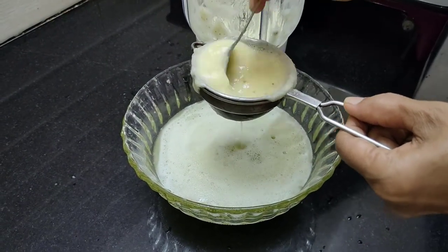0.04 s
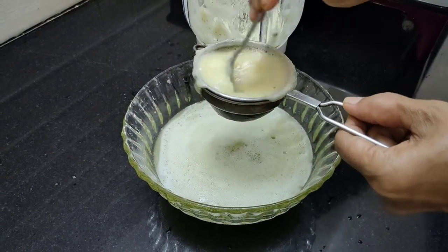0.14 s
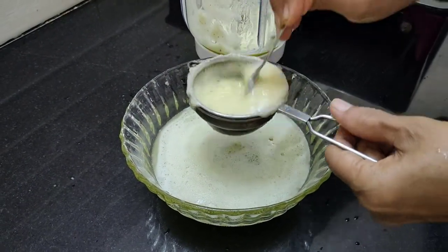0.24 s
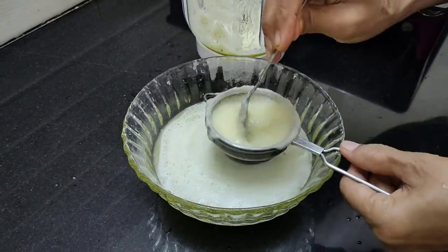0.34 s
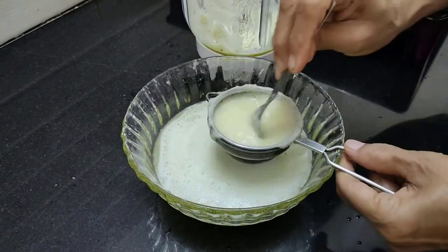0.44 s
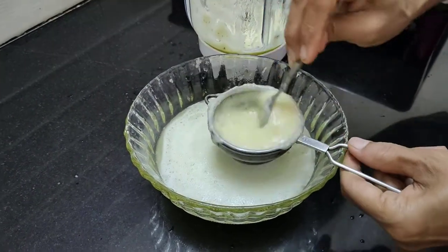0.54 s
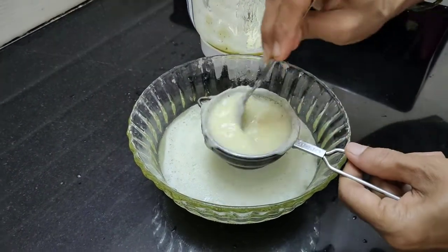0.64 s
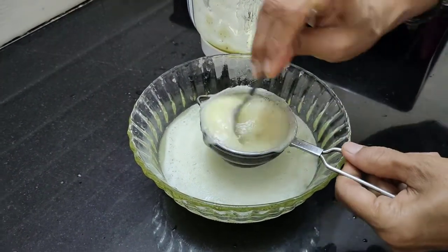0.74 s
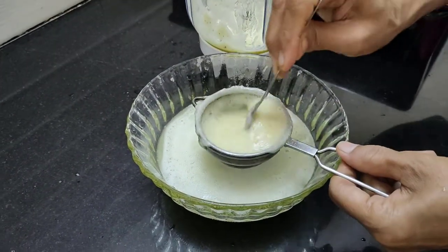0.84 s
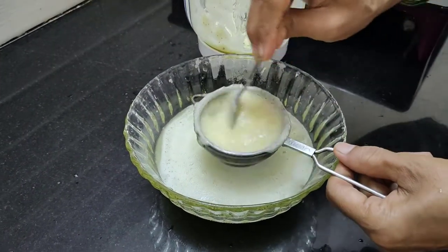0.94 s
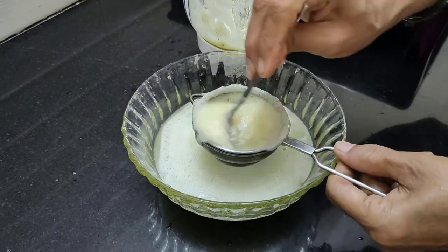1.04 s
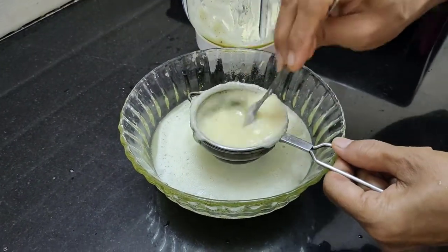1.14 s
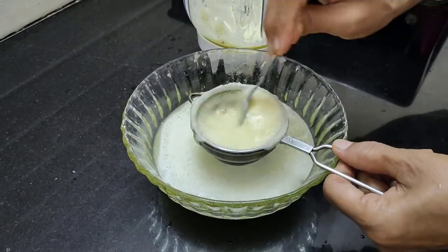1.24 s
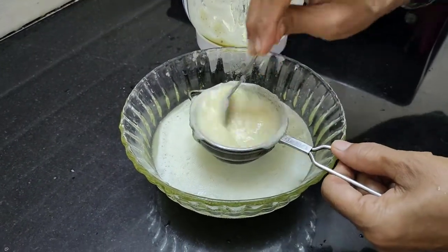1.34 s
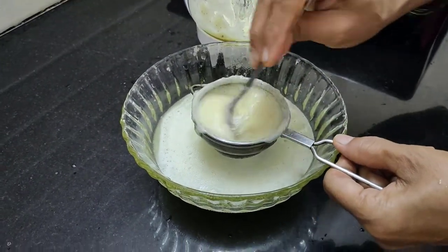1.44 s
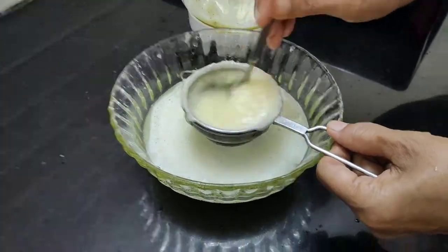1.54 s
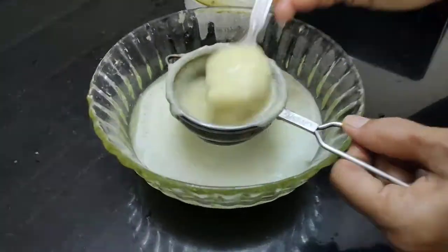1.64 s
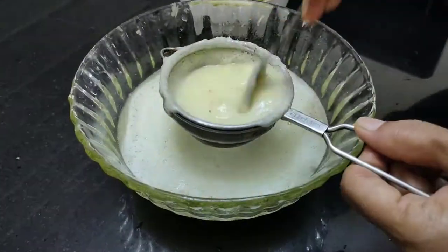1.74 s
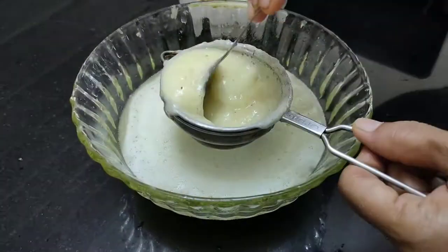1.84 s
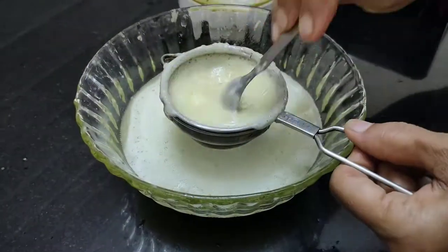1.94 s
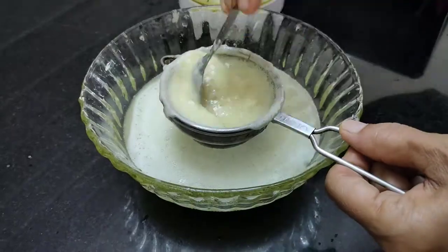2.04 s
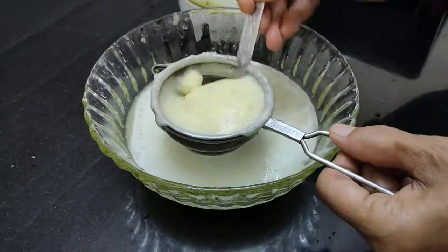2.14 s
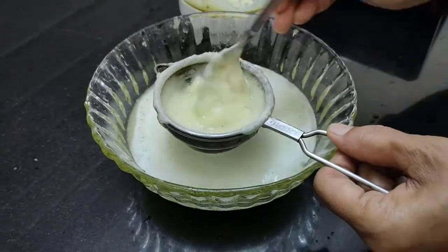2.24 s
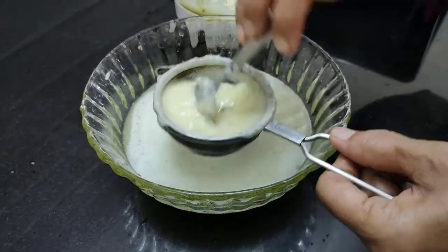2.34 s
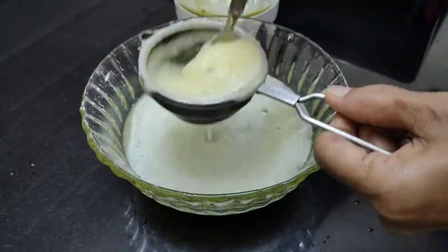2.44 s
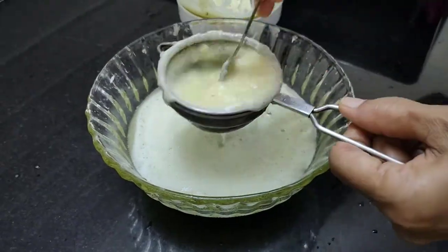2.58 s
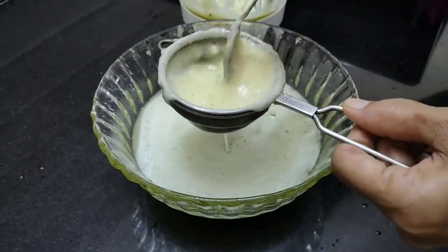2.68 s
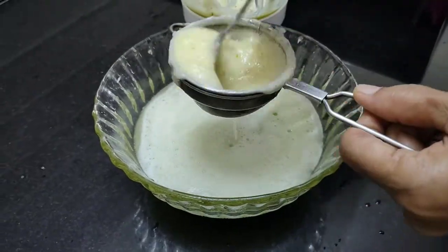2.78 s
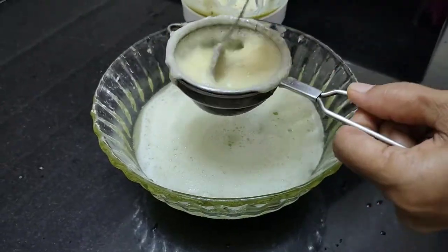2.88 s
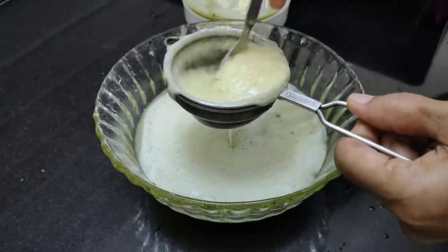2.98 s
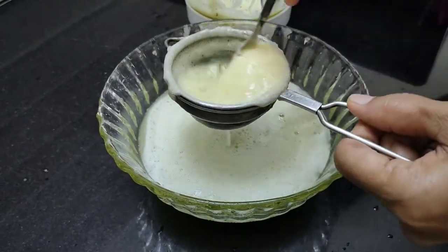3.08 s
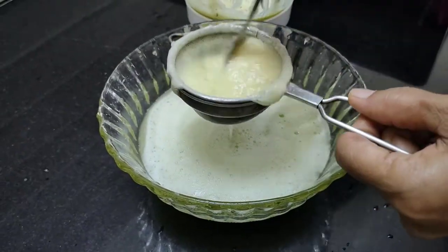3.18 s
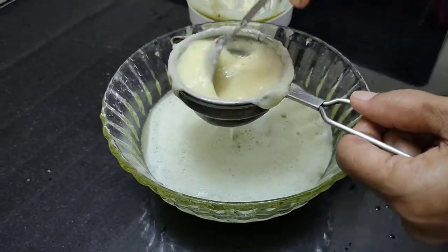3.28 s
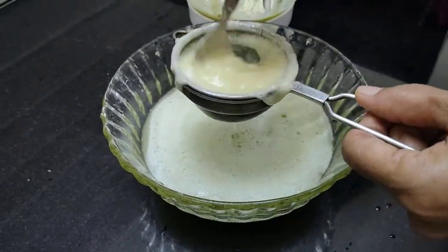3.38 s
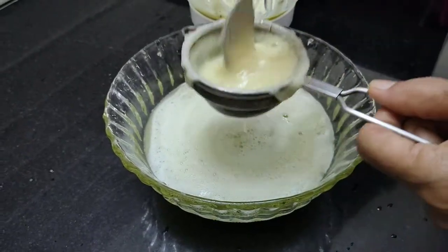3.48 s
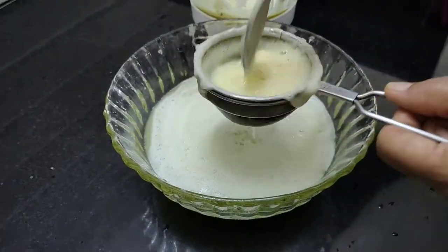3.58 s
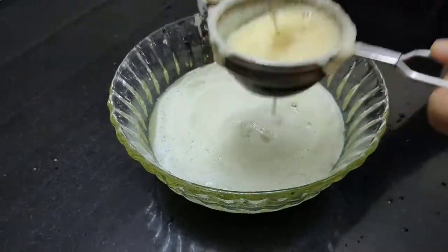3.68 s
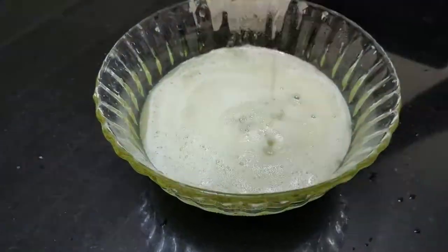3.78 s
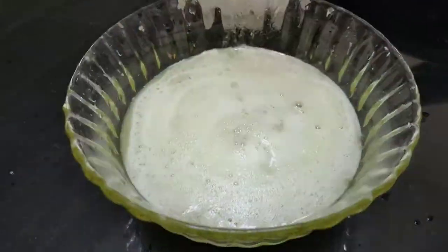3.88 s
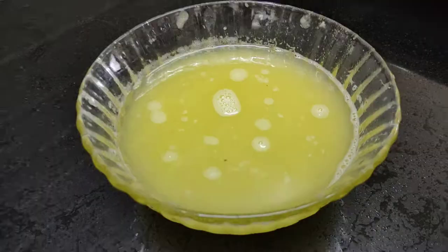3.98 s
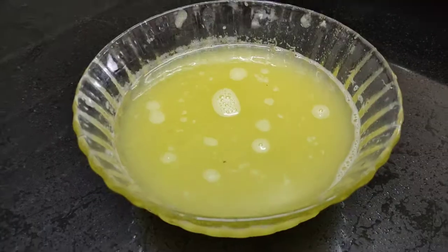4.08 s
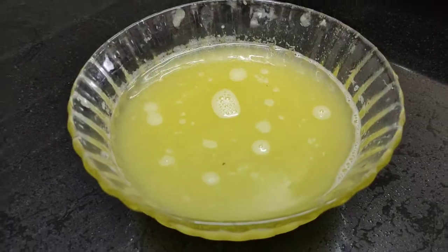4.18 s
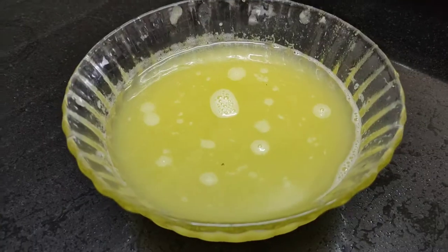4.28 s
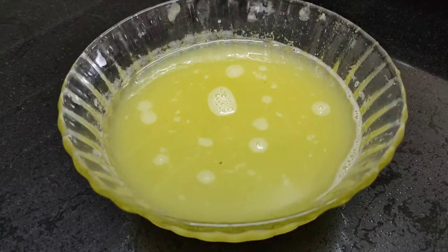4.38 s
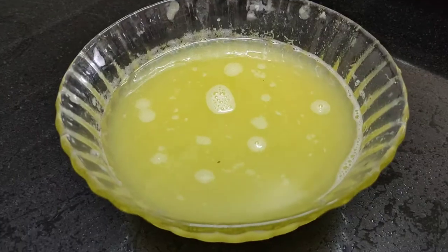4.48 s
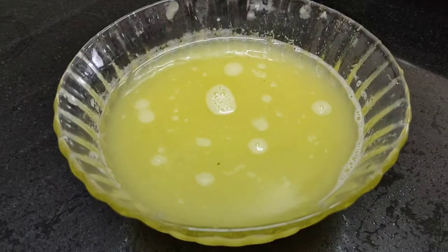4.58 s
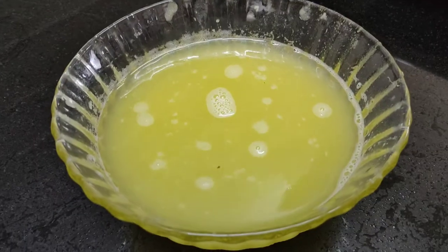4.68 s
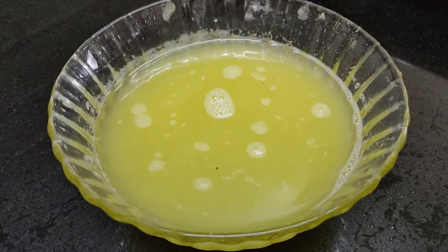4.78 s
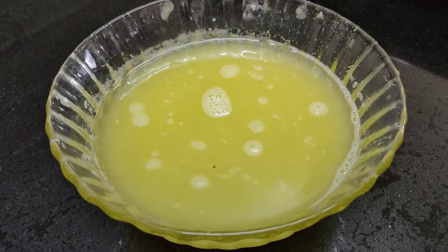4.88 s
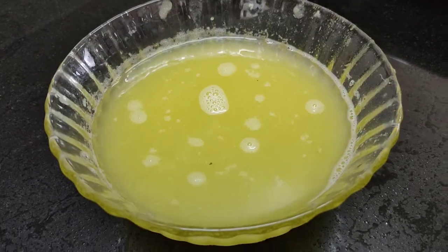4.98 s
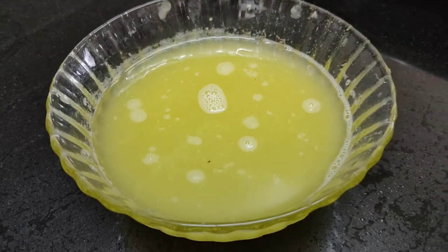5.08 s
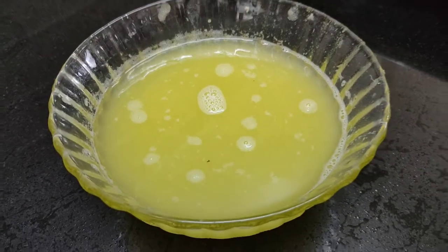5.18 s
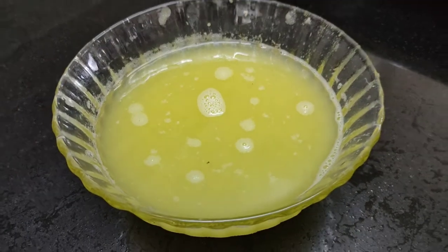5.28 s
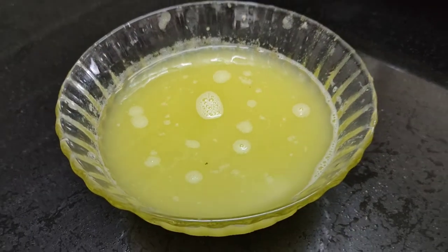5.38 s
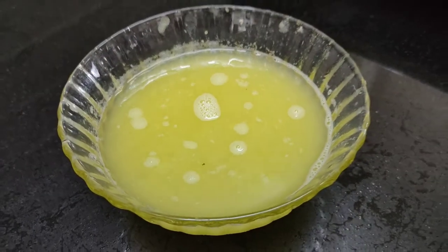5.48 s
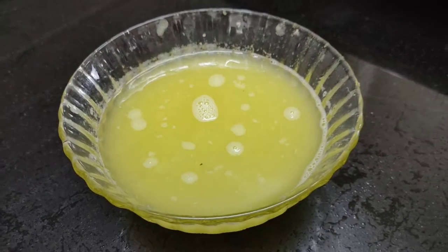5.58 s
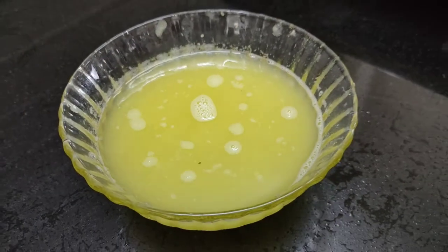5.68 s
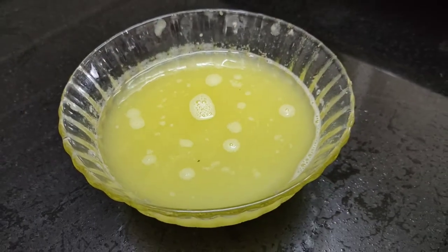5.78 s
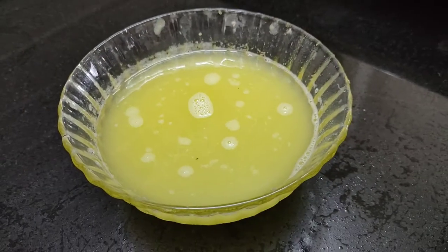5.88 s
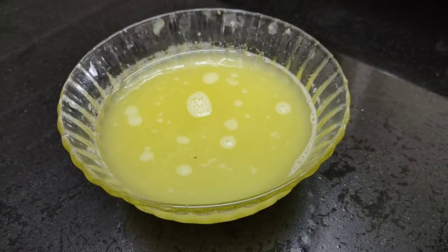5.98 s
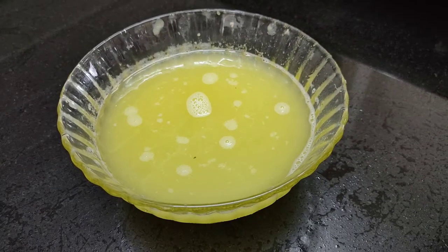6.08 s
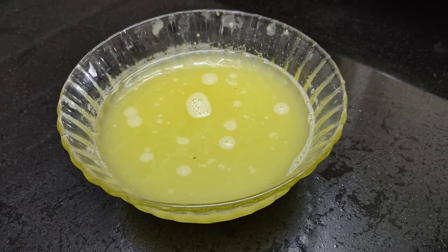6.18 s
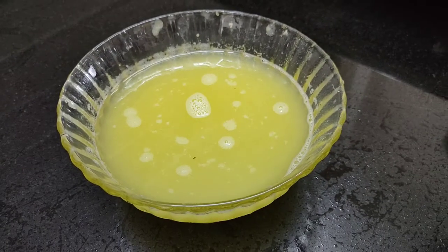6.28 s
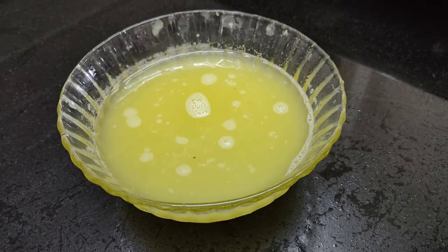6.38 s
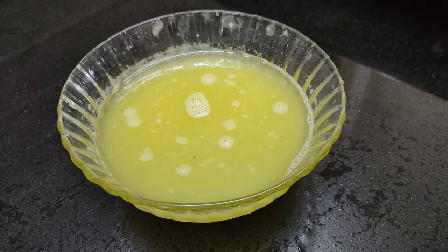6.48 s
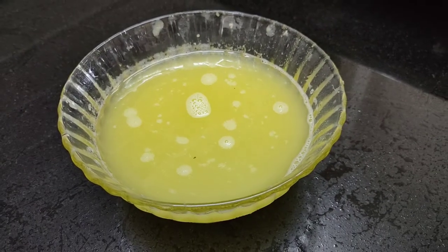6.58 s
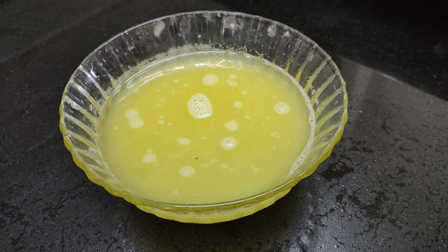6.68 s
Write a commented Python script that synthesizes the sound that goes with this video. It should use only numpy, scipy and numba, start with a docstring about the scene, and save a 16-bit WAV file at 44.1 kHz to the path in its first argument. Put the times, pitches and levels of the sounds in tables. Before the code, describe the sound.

Brisk, irregular spoon strokes squish and scrape thick pulp through fine wire mesh, with slippery plops, a brief gurgle and steel clicks, heard close in stereo with short kitchen reflections. After a short pause comes a quick run of loud metallic raps. The background then changes to a soft motor drone; a glassy dish lands, bounces, chatters against the worktop and rings away.

```python
"""A steel spoon works wet pulp through a fine mesh strainer over a glass bowl. Squelches are noise pops in gliding
pocket resonances; rasp and fizz are random grains coloured by the mesh; rim ticks and the knocks that clean
the strainer are noise bursts with decaying sines. Then, in a kitchen of motor tones and low noise, a dish is
brushed, set down and rocks to rest: each contact excites a bank of decaying modes."""
import sys
import numpy as np
from scipy import signal
from scipy.fft import rfft, irfft, next_fast_len
from scipy.io import wavfile
from scipy.ndimage import uniform_filter1d
from numba import njit

SR = 44100
rng = np.random.default_rng(int(sys.argv[2]) if len(sys.argv) > 2 else 0)


def generate_wav(signal):
    """Clip the signal to [-1, 1] and save it as 16-bit WAV at the path in sys.argv[1]."""
    frames = np.transpose(np.atleast_2d(signal))
    scaled = np.clip(frames, -1, 1) * 32767
    pcm = np.round(scaled).astype(np.int16)
    wavfile.write(sys.argv[1], SR, pcm)


N = 296793
TOP_HZ = 15750
TIME = np.arange(N) / SR
# left and right halves of a stereo difference
SIDES = np.array([[.5], [-.5]])


def undb(db):
    """Logarithmic level: decibels to gain."""
    return 10 ** (np.asarray(db) / 20)


def unit(x):
    """Normalisation: scale to rms 1."""
    return x / np.sqrt(np.mean(x ** 2))


def curve(rows):
    """Linear interpolation: join (s, value) rows by straight lines."""
    return np.interp(TIME, *np.transpose(rows))


def colour(x, points, peaks=()):
    """Spectral shaping: filter a white sound by (Hz, dB) points and resonances, keeping its power."""
    size = next_fast_len(x.shape[-1], True)
    f = np.fft.rfftfreq(size, 1 / SR)
    hz, db = np.transpose(points)
    shape = np.interp(np.log(f + 1), np.log(hz), db)
    for centre, width, lift, pan in peaks:
        shape = shape + (lift + pan * SIDES) / (1 + (2 * (f - centre) / width) ** 2)
    spectrum = rfft(x, size) * unit(undb(shape))
    return irfft(spectrum, size)[..., :x.shape[-1]]


def pair(size, alike_hz):
    """Interaural coherence: stereo noise alike below alike_hz, unrelated above it and in the deepest rumble."""
    f = np.fft.rfftfreq(size, 1 / SR)
    mid, side = rfft(rng.standard_normal((2, size)))
    apart = .05 + .95 * f ** 2 / (f ** 2 + alike_hz ** 2) + .7 / (1 + (f / 75) ** 4)
    return unit(irfft(mid * np.sqrt(2 - apart) + 2 * SIDES * side * np.sqrt(apart), size))


def fade(t, t60):
    """Exponential decay: a fall of 60 dB in t60 seconds."""
    return undb(-60 * t / t60)


def add(out, s, sound):
    """Superposition: mix a sound in at time s."""
    i = max(int(s * SR), 0)
    out[..., i:i + sound.shape[-1]] += sound[..., :N - i]


def grains(per_s, spread_db):
    """Shot noise: tiny impulses of uneven size at random moments."""
    size = undb(spread_db * np.clip(rng.standard_normal(N), -2, 2))
    return unit((rng.random(N) < per_s / SR) * size * rng.choice([-1, 1], N))


def walk(per_s):
    """Low-frequency noise: a random wander with a spread near 1."""
    knots = np.arange(0, N / SR + 1, 1 / per_s)
    return 1.2 * np.interp(TIME, knots, rng.standard_normal(len(knots)))


def swells(rows):
    """Gaussian envelopes: bell-shaped gains from (s, half length s, dB) rows."""
    return sum(undb(db) * np.exp(-((TIME - s) / half) ** 2) for s, half, db in rows)


def brighten(x, db, corner_hz):
    """Contact stiffness: a harder contact lifts the treble."""
    low = signal.lfilter(*signal.butter(1, corner_hz, fs=SR), x)
    return low + undb(db) * (x - low)


@njit
def cavity(x, hz, q):
    """Cavity resonance: a band-pass with a moving centre."""
    y, b, l = np.empty(len(x)), 0., 0.
    for i in range(len(x)):
        g = np.tan(np.pi * hz[i] / SR)
        v = (b + g * (x[i] - l)) / (1 + g * (g + 1 / q))
        b, l, y[i] = 2 * v - b, l + 2 * g * v, v
    return y


def chirp(hz, glide, cycles):
    """Damped resonance: a tone, as of an air pocket, dies over some cycles, sliding in octaves per s."""
    t = TIME[:SR // 12]
    age = t * hz / cycles
    phase = 2 * np.pi * np.cumsum(hz * 2 ** (glide * t)) / SR
    return np.sin(phase) * np.exp(-age) * (1 - np.exp(-10 * age))


def blow(t, points, peaks, ring_t60, tail_db, tail_t60, alike_hz, contact_s=0.0003):
    """High modal density: a noise burst of crowded, fast-dying resonances with a softer tail from the walls."""
    envelope = np.hypot(fade(t, ring_t60), undb(tail_db) * fade(t, tail_t60)) * np.tanh(t / contact_s)
    return colour(pair(len(t), alike_hz), points, peaks) * envelope


def hum(lines):
    """Harmonic motion: steady motor tones as sines of random phase."""
    return sum(np.sqrt(2) * undb(db) * np.sin(2 * np.pi * (hz * TIME + rng.random())) for hz, db in lines)


# Spectrum of the quiet air behind the straining. Each row: frequency in Hz, relative density in dB per Hz.
QUIET_COLOUR = [(25, 0), (100, -1.5), (250, 0), (390, -4.5), (520, -5.5), (900, -2.5), (2000, -8.5),
                (5000, -19), (15000, -32.5)]
# A faint hum in it. Each row: frequency in Hz, level in dB.
FAINT_HUM = [(383, -73), (439, -78), (532, -76)]


def quiet_air(quiet_db=-65):
    """Broadband background: shaped noise and faint steady tones."""
    return undb(quiet_db) * colour(pair(N, 500), QUIET_COLOUR) + hum(FAINT_HUM)


# The spoon scrapes out and sweeps back, usually softer. Each row: peak in seconds, half length in seconds
# before the rise and fall factors, rasp in dB, treble lift in dB, squelch in dB, squelch pitch in Hz,
# delay of the sweep back in seconds, its squelch in dB, its pitch in Hz. Levels are relative.
STROKES = [(.002, 0.017, -44, -5, -37.5, 1330, 0.074, -58.5, 836),
           (0.174, 0.019, -40, 0, -41.5, 1575, 0.071, -56, 1360),
           (0.442, 0.019, -36.5, -0.5, -36, 1510, 0.071, -36.5, 1296),
           (0.583, 0.014, -37, 1, -41.5, 1416, 0.014, -73, 1300),
           (0.717, .025, -30.5, -4.5, -39, 1440, 0.016, -59, 1400),
           (0.771, 0.021, -32.5, 4.5, -32.5, 1700, 0.088, -40.5, 1590),
           (0.926, 0.02, -29, 5.5, -34.5, 1550, 0.037, -39.5, 1190),
           (1.077, 0.02, -33.5, 7, -39, 1650, 0.09, -38.5, 1620),
           (1.215, 0.016, -28.5, -4, -37, 1500, .069, -33, 1230),
           (1.351, 0.01, -31.5, 7, -37.5, 1546, 0.098, -40, 1690),
           (1.485, .018, -27.5, 4.5, -30, 1674, 0.061, -43.5, 1700),
           (1.761, .014, -36, 9.5, -27, 1706, .03, -54, 1540),
           (1.878, 0.022, -50, 9.5, -42, 1830, .075, -40, 1820),
           (2.018, 0.013, -37, 3, -33.5, 1910, 0.04, -42, 1255),
           (2.128, 0.024, -36, 7.5, -35, 2240, 0.074, -63, 2090),
           (2.329, 0.053, -37.5, -8, -47, 1430, .044, -34.5, 1590),
           (2.402, 0.029, -29.5, 3.5, -37, 1780, 0.068, -32.5, 1760),
           (2.524, 0.015, -25, 4, -35, 1614, 0.08, -34.5, 1250),
           (2.642, 0.004, -23, 2.5, -45, 2220, .01, -55.5, 1800),
           (2.741, .014, -38.5, 9.5, -30.5, 1537, 0.087, -36.5, 2010),
           (2.928, 0.014, -28.5, 2, -30, 1560, .067, -37.5, 1516),
           (3.06, 0.02, -34.5, 5, -40, 1920, 0.044, -38, 1690),
           (3.163, 0.01, -46, 7.5, -40, 1780, 0.027, -65, 1600),
           (3.24, 0.0079, -40, 7, -34.5, 1720, 0.038, -39.5, 1540),
           (3.298, 0.014, -26, 0, -27, 1740, 0.037, -33, 1616),
           (3.371, 0.0057, -32.5, 0.5, -42, 1670, 0.027, -52, 1520),
           (3.418, 0.015, -29, 2, -33.5, 1900, 0.021, -62, 1710)]


def sweeps(rise=1.2, fall=1, back_half_s=.022, back_rasp_db=-3):
    """Reciprocating motion: each stroke out and back, as (s, rise s, fall s, squelch dB, pitch Hz, rasp dB)."""
    for s, half, dry_db, _, wet_db, hz, delay, back_db, back_hz in STROKES:
        yield s, rise * half, fall * half, wet_db, hz, dry_db
        yield s + delay, rise * back_half_s, fall * back_half_s, back_db, back_hz, back_db + back_rasp_db


def strokes(slips, wobble=0.083, wire_ratio=2.05, deep_share=0.605, deep_db=-11, pulp_lag=1.1,
            pocket_q=7, sag_octaves_per_s=7):
    """Forced resonance: pops excite squeezed air pockets, slips excite the wires; pitches sink and waver."""
    pops = grains(1800, 5)
    squelch, wires, pressure, kneading = np.zeros((4, N))
    for s, rise, fall, wet_db, hz, dry_db in sweeps():
        span = slice(max(int((s - .1) * SR), 0), int((s + .1) * SR))
        t = TIME[span] - s
        push = np.exp(-(t / np.where(t < 0, rise, fall)) ** 2)
        # the pulp closes more slowly than the spoon lets go
        squeeze = np.exp(-(t / np.where(t < 0, rise, fall * pulp_lag)) ** 2)
        effort = np.sqrt(np.mean(push ** 2))
        waver = np.interp(t, np.linspace(-.1, .1, 16), rng.standard_normal(16))
        pitch = hz * 2 ** (-sag_octaves_per_s * t) * np.exp(wobble * waver)
        # a small pocket in front of the spoon and a larger, weaker one beneath it
        for share, db in ((1, 0), (deep_share, deep_db)):
            pocket = cavity(cavity(pops[span] * squeeze, share * pitch, pocket_q), share * pitch, 1.3)
            squelch[span] += unit(pocket) * effort * undb(wet_db + db)
        # the wires under the spoon ring about an octave above the pocket, sliding as the contact moves
        wire_pitch = wire_ratio * pitch * np.exp(-.2 * waver)
        wires[span] += unit(cavity(slips[span] * push, wire_pitch, 9.)) * effort * undb(dry_db)
        pressure[span] += (push * undb(dry_db)) ** 2
        kneading[span] += squeeze * undb(wet_db)
    return squelch, wires, pressure, kneading


def bubbles(bubble_db=-1.5, cycles=6.5, sag=0.94, count=9):
    """Bubble acoustics: every sweep bursts a handful of small bubbles scattered around its pitch."""
    out = np.zeros(N)
    for s, rise, fall, wet_db, hz, _ in sweeps():
        for when, size, strength, slide in np.clip(rng.standard_normal((count, 4)), -1.7, 1.7):
            pitch = sag * hz * np.exp(.22 * size)
            at = s + 0.41 * when * (rise if when < 0 else fall)
            add(out, at, undb(wet_db + bubble_db + 2.4 * strength) * chirp(pitch, 8 * slide, cycles))
    return out


def pings(ping_db=-9, centre_hz=5200, spread=0.31, cycles=20, count=7):
    """Plucked excitation: in each sweep the spoon's edge plucks single wires, each with its own short ring."""
    out = np.zeros(N)
    for s, rise, fall, _, _, dry_db in sweeps():
        for when, size, strength in np.clip(rng.standard_normal((count, 3)), -1.8, 1.8):
            pitch = min(centre_hz * np.exp(spread * size), TOP_HZ)
            at = s + .5 * when * (rise if when < 0 else fall)
            add(out, at, undb(dry_db + ping_db + 4.5 * strength) * chirp(pitch, 0, cycles))
    return out


# Spectrum of the rasp. Each row: frequency in Hz, relative density in dB per Hz.
RASP_COLOUR = [(40, -57), (300, -51), (900, -31.5), (1600, -2), (2500, 3), (3200, -10), (5000, -2.5),
               (7200, 4.5), (10000, -2), (15500, -14.5)]
# Resonances of strainer and spoon, also heard in the fizz and rim ticks. Each row: frequency in Hz,
# width in Hz, lift in dB, left minus right in dB.
MESH = [(1200, 660, 15.5, 3.5), (1780, 69, 0, 12.5), (2550, 45, 7, 2), (2977, 190, 7, -15.5),
        (4015, 96, 9.5, 3), (5220, 210, 0.5, -13.5), (6620, 85, 1.5, -11), (13800, 1500, 0, 8)]


def rasp(slips, wires, pressure, touching, drag_db=-46, wire_db=-4.0):
    """Stick-slip friction: slips of the spoon's edge excite the mesh, with ringing and plucked wires."""
    drag = np.hypot(np.sqrt(pressure), undb(drag_db) * touching)
    sound = colour(slips * drag, RASP_COLOUR, MESH) + undb(wire_db) * wires + pings()
    # the angle of the spoon's edge makes each stroke brighter or duller
    return brighten(sound, curve([(s, treble_db) for s, _, _, treble_db, *_ in STROKES]), 4500)


# Spectrum of the juice's fizz. Each row: frequency in Hz, relative density in dB per Hz.
FIZZ_COLOUR = [(2000, -39), (4500, -12), (7500, -3), (10000, 4.5), (15500, -4)]
# Gushes of juice through the mesh. Each row: peak in seconds, half length in seconds, relative level in dB.
GUSHES = [(2.71, 0.034, -30), (2.83, 0.068, -35), (3.42, 0.046, -43), (3.48, 0.061, -55.5),
          (3.75, 0.14, -56.5)]


def fizz(catching, pressure, touching, squirt_db=-28, seep_db=-54):
    """Flow noise: juice seeps at each touch, gushes, and squirts under the hardest strokes."""
    flow = undb(seep_db) * touching + swells(GUSHES)
    flow = flow + undb(squirt_db) * (pressure / pressure.max()) ** 0.79
    return colour(grains(6300, 4.3) * np.sqrt(catching) * flow, FIZZ_COLOUR, MESH)


# Spectrum of the churning pulp. Each row: frequency in Hz, relative density in dB per Hz.
CHURN_COLOUR = [(80, -7), (200, -2.5), (290, 1), (380, 9), (470, -9), (700, -5), (1200, -6.5), (2500, -35)]
# The hollow of the strainer's cup. Each row: frequency in Hz, width in Hz, lift in dB, left minus right in dB.
CUP = [(380, 25, 7.5, 2)]
# Deep presses turn the whole pulp over. Each row: peak in seconds, half length in seconds, relative level in dB.
PRESSES = [(2.42, 0.059, -54.5), (2.63, 0.11, -46.5)]


def churn(kneading, knead_db=-36):
    """Cavity-coloured shot noise: kneaded pulp pops in the hollow of the cup."""
    return colour(grains(680, 3.8) * (undb(knead_db) * kneading + swells(PRESSES)), CHURN_COLOUR, CUP)


# Larger air pockets are squeezed out. Each row: peak in seconds, half length in seconds, pitch in Hz at the
# peak before jitter, relative level in dB, glide in octaves per second.
PLOPS = [(0.257, 0.0057, 1330, -34.5, -3), (0.435, 0.013, 1480, -34, -1.5), (.52, 0.0099, 1350, -32, -19),
         (0.576, 0.011, 1480, -32, -15), (.716, 0.0094, 1290, -28, -9.5), (0.862, 0.0075, 1400, -32.5, 11),
         (0.999, 0.013, 1560, -34.5, -2), (1.156, 0.0089, 1610, -26, -9), (1.261, 0.018, 850, -39.5, 9.5),
         (1.292, .011, 1420, -28, 17.5), (1.432, 0.015, 1600, -34, 13.5),
         (1.739, 0.0034, 1150, -26.5, -23.5), (1.761, .008, 2000, -23, 11), (1.765, .014, 900, -41, -6.5),
         (1.947, .013, 1600, -36.5, -11), (2.01, 0.0088, 2050, -30, -16), (2.116, 0.017, 2700, -37, -12),
         (2.335, 0.0078, 1400, -32, -11), (2.421, .009, 1650, -27.5, -14), (3, .0045, 1720, -23, -17),
         (3.061, 0.013, 1950, -27, -35), (3.1, 0.016, 1550, -35, -13), (3.24, 0.0063, 1700, -33.5, -21.5),
         (3.28, 0.0044, 1750, -24, -26), (3.421, 0.01, 1900, -24.5, -35.5)]


def plops(rough=.55, jitter=.035, flutter_per_s=330):
    """Volume-dependent resonance: a pocket flutters as it is squeezed out, its pitch sliding with its size."""
    out, flutter, waver = np.zeros(N), walk(flutter_per_s), walk(flutter_per_s)
    for s, half, hz, db, glide in PLOPS:
        span = slice(int((s - 3 * half) * SR), int((s + 3 * half) * SR))
        t = TIME[span] - s
        pitch = hz * 2 ** (glide * t) * np.exp(jitter * waver[span])
        envelope = undb(db) * np.exp(-(t / half) ** 2) * (1 + rough * flutter[span])
        out[span] += envelope * np.sin(2 * np.pi * np.cumsum(pitch) / SR)
    return out


# Juice dribbles into the bowl. Each row: peak in seconds, half length in seconds, relative level in dB.
DRIBBLES = [(1.555, 0.022, -59), (1.745, 0.012, -57), (3.745, 0.014, -55), (3.79, 0.085, -58.5)]
# Its spectrum. Each row: frequency in Hz, relative density in dB per Hz.
DRIBBLE_COLOUR = [(60, -21), (170, -9), (270, -2.5), (400, -2), (600, -8), (1500, -21), (4000, -41.5)]


def dribbles():
    """Damped impact: thick juice lands dully on the foam in the bowl."""
    return colour(grains(1100, 2.5), DRIBBLE_COLOUR) * swells(DRIBBLES)


# Course of the gurgle. Each row: time in seconds, central bubble pitch in Hz, relative level in dB.
GROAN = [(2.5, 505, -63), (2.56, 573, -48), (2.605, 760, -41.5), (2.645, 752, -41), (2.675, 510, -47.5),
         (2.705, 382, -47.5), (2.735, 330, -68)]


def gurgle(gurgle_db=2.5, scatter=.24, cycles=4.5, count=44):
    """Bubble acoustics: a string of large bubbles under a press, rising, then sinking as the pulp empties."""
    out = np.zeros(N)
    s, hz, db = np.transpose(GROAN)
    for k, (when, size) in enumerate(rng.uniform(-1.03, 1, (count, 2))):
        at = s[0] + (s[-1] - s[0]) * (k + when / 2) / count
        pitch = np.interp(at, s, hz) * np.exp(2 * scatter * size)
        add(out, at, undb(gurgle_db + np.interp(at, s, db)) * chirp(pitch, 0, cycles))
    return out


def squeal(hz=7600, q=60, peak_s=3.12, half_s=.17):
    """Friction-driven resonance: the spoon's edge makes a wire sing thinly."""
    pitch = np.full(N, float(hz))
    song = cavity(cavity(rng.standard_normal(N), pitch, float(q)), pitch, float(q))
    return unit(song) * swells([(peak_s, half_s, -51)])


def room(x, early_db, early_t60, late_db, late_t60):
    """Reverberation: direct sound, one sample earlier on the right, then near and wall reflections."""
    t = TIME[:SR // 2]
    early = unit(fade(t, early_t60) * (t > .001)) * undb(early_db)
    late = unit(fade(t, late_t60) * (t > .008)) * undb(late_db)
    response = pair(len(t), 740) * np.hypot(early, late) / np.sqrt(len(t))
    response[[0, 1], [1, 0]] += 1
    response /= np.sqrt(np.sum(response ** 2) / 2)
    return signal.fftconvolve(np.broadcast_to(x, (2, N)), response, axes=1)[:, :N]


# The spoon rests on the mesh and drags lightly. Each row: start in seconds, end in seconds.
CONTACT = [(.41, .61), (.67, .99), (1.05, 1.385), (1.43, 1.56), (2.0, 2.16), (2.3, 2.655), (2.73, 3.13),
           (3.24, 3.45)]


def stirring(squelch_db=-3.0, rasp_db=-1.0, fizz_db=0, churn_db=-2):
    """Superposed friction, flow and bubble sounds of the strokes, reflected by bowl, worktop and walls."""
    # the spoon's edge catches and lets go, so the slips come in clusters
    catching = unit(undb(3.5 * walk(190)))
    slips = grains(2200, 5.5) * catching
    squelch, wires, pressure, kneading = strokes(slips)
    # 20 ms smoothing softens the edges of each contact
    touching = uniform_filter1d(sum(1. * ((TIME > a) & (TIME < b)) for a, b in CONTACT), SR // 50)
    pulp = undb(squelch_db) * squelch + undb(churn_db) * churn(kneading)
    pulp = pulp + gurgle() + dribbles() + plops() + bubbles()
    mesh = undb(rasp_db) * rasp(slips, wires, pressure, touching)
    mesh = mesh + undb(fizz_db) * fizz(catching, pressure, touching) + squeal()
    return room(pulp + mesh, early_db=-3.0, early_t60=.045, late_db=-8.5, late_t60=.12)


# The spoon meets the rim or catches on the wires. Each row: start in seconds, level in dB, treble lift in dB,
# pitch in Hz of the part that rings.
TICKS = [(0.3269, -16.5, -3.5, 1423), (0.3308, -10.5, 3.5, 4850), (0.345, -16.5, -5, 2620),
         (0.3965, -36, -1, 3920), (0.403, -29, 0, 3620), (0.4881, -21.5, 0.5, 3920), (0.669, -23, -4, 4050),
         (0.677, -19, -1.5, 4100), (1.217, -21.5, -13, 3950), (1.343, -23, 5.5, 3180),
         (1.638, -44.5, 14, 4640), (1.7356, -21, -19, 1940), (1.785, -36, 11, 4170),
         (2.025, -21.5, -17, 4200), (2.066, -21.5, 0.5, 3000), (2.082, -30.5, 10.5, 2600),
         (2.298, -15, 1, 4080), (2.493, -26.5, 1, 3830), (2.527, -16.5, -4, 2926), (2.923, -20.5, -3, 7330),
         (3.049, -20.5, 1.5, 3020), (3.2767, -20, -12, 1800), (3.405, -32, 7, 2140)]
# Spectrum of the crack. Each row: frequency in Hz, relative density in dB per Hz.
TICK_COLOUR = [(40, -59.5), (300, -37.5), (750, -19), (1200, -8.5), (2200, 3.5), (4000, 7.5), (7000, 6.5),
               (10000, -5), (15500, -4)]


def rim_ticks(ring_db=-5, ring_t60=0.052):
    """Damped impact: steel on steel, muted by the pulp; each contact rings a part at its own pitch."""
    out, t = np.zeros((2, N)), TIME[:SR // 4]
    for s, db, treble_db, hz in TICKS:
        crack = blow(t, TICK_COLOUR, MESH, ring_t60=0.024, tail_db=-10.0, tail_t60=0.14, alike_hz=921)
        ring = undb(ring_db) * np.sin(2 * np.pi * hz * t + SIDES) * fade(t, ring_t60) * np.tanh(t * hz)
        add(out, s, undb(db) * brighten(crack + ring, treble_db, 4000))
    return out


# Faint flickers of narrow-band noise. Each row: peak in seconds, half length in seconds, relative level in dB,
# centre in Hz.
FLICKERS = [(4.09, 0.091, -62.5, 1400), (4.376, 0.067, -59.5, 1575), (4.555, 0.067, -58, 1880),
            (5.886, 0.032, -51, 5340), (5.892, 0.073, -52.5, 2266), (6.024, 0.076, -55, 7490),
            (6.029, .06, -58.5, 4380), (6.046, 0.081, -55.5, 1530), (6.67, 0.062, -55.5, 1875)]
# Soft low bumps. Each row: start in seconds, pitch in Hz, relative level in dB.
BUMPS = [(3.723, 52.6, -56), (4.059, 103, -43)]


def bumps_and_flickers(cycles=15.0, spread=0.26, count=4):
    """Band-limited noise and damped tones: soft low bumps, and faint noise flickers in a few narrow bands."""
    out, t = np.zeros((2, N)), TIME[:SR // 2]
    for s, half, db, hz in FLICKERS:
        hiss = rng.standard_normal((2, len(t))) ** 3
        flicker = 0
        for step in (np.arange(count) + rng.random(count)) * 2 / count - 1:
            pitch = np.full(len(t), hz * np.exp(spread * step))
            flicker = flicker + np.array([cavity(cavity(side, pitch, 22.), pitch, 22.) for side in hiss])
        add(out, s - t.mean(), undb(db) * unit(flicker) * np.exp(-((t - t.mean()) / half) ** 2))
    for s, hz, db in BUMPS:
        bump = chirp(hz, 0, cycles)
        add(out, s, undb(db) * bump * np.linspace(2, 0, len(bump)))
    return out


# The strainer is knocked clean. Each row: start in seconds, level in dB, treble lift in dB, frame ring in Hz,
# its t60 in seconds.
KNOCKS = [(3.8585, -18.5, -4, 1600, .04), (3.8852, -22, 9, 1900, .05), (3.8916, -8, 2, 1770, .045),
          (3.9309, -3.5, -4, 1745, .055), (3.9736, -2, 1.5, 1697, .062)]
# Spectrum of the crack. Each row: frequency in Hz, relative density in dB per Hz.
KNOCK_COLOUR = [(40, -38), (400, -39), (780, -19), (1100, -23.5), (1400, -10), (1700, -2), (2100, -11.5),
                (2800, -17.5), (4100, -18.5), (6000, -23), (8000, -13), (9200, -21.5), (12000, -23),
                (15500, -34)]


def knocks(frame_db=-1, frame_pan_db=4, crack_db=-2, echo_db=-7, upper_ratio=1.17, upper_db=-13):
    """Modal impact and echo: blows on the held strainer ring two frame modes; a near wall returns each one."""
    out, t = np.zeros((2, N)), TIME[:SR // 4]
    for s, db, treble_db, hz, frame_t60 in KNOCKS:
        envelope = fade(t, frame_t60) * np.tanh(t * hz)
        frame = np.sin(2 * np.pi * hz * t + SIDES) * envelope * undb(frame_db + frame_pan_db * SIDES)
        frame += undb(upper_db) * np.sin(2 * np.pi * upper_ratio * hz * t - SIDES) * envelope
        crack = blow(t, KNOCK_COLOUR, (), ring_t60=0.03, tail_db=-9, tail_t60=.13, alike_hz=1200)
        knock = undb(db) * brighten(undb(crack_db) * crack + frame, treble_db, 3700)
        add(out, s, knock)
        add(out, s + .0095, undb(echo_db) * brighten(knock, -10, 3000))
    return out


# Spectrum of the kitchen air. Each row: frequency in Hz, relative density in dB per Hz.
KITCHEN_COLOUR = [(25, -27), (55, -3), (110, -2.5), (210, -1), (275, -9), (360, -4), (520, -7), (700, -7),
                  (1000, -29.5), (1800, -36.5), (3500, -46.5), (15000, -49)]
# A motor's hum. Each row: frequency in Hz, level in dB before the swell.
HUM = [(134.6, -52), (166.9, -81), (220.7, -59), (339.1, -56.5)]


def kitchen(air_db=-47):
    """Tonal and broadband noise: a motor hums under a low rush of air, and both swell in."""
    swell_db = curve([(4.05, -8.5), (4.3, -0.5), (4.9, 1), (5.9, -0.5), (6.7, -2)])
    return (undb(air_db) * colour(pair(N, 490), KITCHEN_COLOUR) + hum(HUM)) * undb(swell_db)


# Rubs on the dish before it is set down. Each row: peak in seconds, half length in seconds, relative level in dB.
BRUSHES = [(4.66, 0.084, -61), (4.82, 0.054, -53.5)]
# Their spectrum. Each row: frequency in Hz, relative density in dB per Hz.
BRUSH_COLOUR = [(500, 1), (2500, -17), (6500, -3), (15000, -7)]


def brushing(width_hz=260, lift_db=15):
    """Friction-excited modes: a light rub makes the dish's first four listed modes whisper."""
    rim = [(hz, width_hz, lift_db, 0) for hz, *_ in DISH[:4]]
    return colour(pair(N, 700), BRUSH_COLOUR, rim) * swells(BRUSHES)


# The dish lands and rocks. Each row: start in seconds, level in dB, treble lift in dB, lift in dB of the
# first listed mode, lift in dB of the second.
CLATTER = [(5.051, -11.5, -10, -3, 2.5), (5.1895, -9, -1.5, 4.5, 7.5), (5.2537, -6, 7.5, 2.5, -7.5),
           (5.3025, -18.5, 1, -1.5, 9.5), (5.3444, -10, -4.5, 10.5, -6), (5.378, -16.5, -17, 9, -1.5),
           (5.399, -15.5, -20, 10, 3), (5.4215, -26.5, -15.5, 12.5, 1), (5.4539, -34.5, -23, 14, -3),
           (5.498, -37.5, -6, 4, 12.5)]
# Its modes, the main rim modes first. Each row: frequency in Hz, relative level in dB, t60 in seconds,
# left minus right in dB.
DISH = [(1510, -4.7, .7, -6), (2763, -8, .68, 6), (4222, -18, .58, 4), (6404, -17.5, .6, 4),
        (188, -21, .3, 0), (439, -21, .55, 3), (679, -20, .5, 4), (1408, -16, .45, -2), (1465, -14, .4, 0),
        (1545, -14, .42, -2), (1601, -13, .45, -2), (1636, -15, .4, -2), (1841, -19, .4, -6),
        (1920, -18, .4, 0), (2513, -25, .42, 0), (2728, -13, .4, 3), (2838, -18, .5, 2), (2876, -18, .5, 2),
        (2905, -19, .45, 2), (3190, -22, .5, 0), (3596, -24, .32, 0), (4162, -21, .5, 2),
        (4600, -29, .35, 0), (5712, -26, .55, 5), (5792, -26, .45, 2), (6361, -20, .5, 4),
        (6562, -23, .4, 3), (6698, -23, .45, 2), (6850, -24, .45, 2), (8010, -28, .38, 0),
        (9000, -29, .3, 0), (9210, -30, .3, -3), (9990, -33, .36, 0), (11210, -35, .28, 0),
        (12200, -31, .38, 4), (14080, -39, .42, 3)]
# Spectrum of the crack. Each row: frequency in Hz, relative density in dB per Hz.
DISH_COLOUR = [(40, -30), (190, -16.5), (300, -15), (1000, -8.5), (1500, 5), (2200, -7), (2800, 0.5),
               (3700, -12.5), (4250, -5), (5100, -37.5), (6400, -2.5), (7800, -24.5), (9300, -16),
               (11200, -40.5), (12200, -21), (13300, -36.5), (15500, -35)]


def dish(ring_db=-2.0, crack_db=-1.5, damping_db_per_s=44, strike=1.0, strike_t60=.09, build_s=0.0066,
         uneven=.95):
    """Modal superposition: landings, then softer rocking; reflections build up and make the ring uneven."""
    out, t = np.zeros((2, N)), TIME[:SR]
    knots = np.arange(170) / 170
    rings = [fade(t, t60) * undb(ring_db + mode_db + pan_db * SIDES) for _, mode_db, t60, pan_db in DISH]
    direct, reflected = 1 + strike * fade(t, strike_t60), uneven * np.tanh(t / build_s)
    for s, db, treble_db, first_db, second_db in CLATTER:
        crack = blow(t, DISH_COLOUR, (), ring_t60=0.046, tail_db=-5.0, tail_t60=0.7, alike_hz=900)
        # the treble of the crack dies faster
        sound = undb(crack_db) * brighten(crack, -damping_db_per_s * t, 5000)
        for k, (hz, *_) in enumerate(DISH):
            # the shorter the wave, the more it differs between the two ears
            apart = min(hz / 1500, 1)
            mid, side = rng.standard_normal((2, len(knots)))
            wander = (mid + 2 * SIDES * apart * side) / np.hypot(1, apart)
            echoes = np.array([np.interp(t, knots, row) for row in wander])
            phase = hz * t + rng.random() + SIDES * apart * rng.uniform(.2, .35) * (-1) ** k
            ring = np.sin(np.float32(2 * np.pi * phase)) * (direct + reflected * echoes) * np.minimum(t * hz, 1)
            sound += ring * rings[k] * undb(first_db * (k == 0) + second_db * (k == 1))
        add(out, s, undb(db) * brighten(sound, treble_db, 3300))
    return out


def chatter(level_db=-21, start_s=5.262, length_s=.19, fall_db=14, count=16):
    """Repeated impact: the rocking rim chatters on the worktop in tiny, dry contacts that tend to weaken."""
    out, t = np.zeros((2, N)), TIME[:SR // 20]
    for when, size in rng.random((count, 2)):
        contact = blow(t, DISH_COLOUR, (), ring_t60=.016, tail_db=-25, tail_t60=.05, alike_hz=700)
        gain = undb(level_db + 8 * size - fall_db * when)
        add(out, start_s + length_s * when, gain * brighten(contact, 4, 3300))
    return out


def scene(cut_s=4.035, resume_s=4.05):
    """Superposition: the straining fades out quickly and gives way to the humming kitchen."""
    before = np.clip((cut_s - TIME) / .03, 0, 1)
    after = np.clip((TIME - resume_s) / .004, 0, 1)
    straining = quiet_air() + stirring() + rim_ticks() + knocks()
    setting_down = kitchen() + brushing() + dish() + chatter()
    return straining * before + setting_down * after + bumps_and_flickers()


def record(dry):
    """Clipping and band limiting: the loudest peaks overload, and the top is cut."""
    low_pass = signal.ellip(10, .2, 70, TOP_HZ, fs=SR, output="sos")
    return signal.sosfilt(low_pass, np.clip(dry, -1, 1))


dry = scene()
out = record(dry)
generate_wav(out)
```